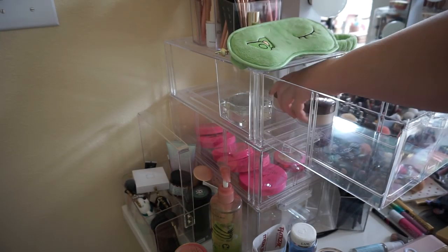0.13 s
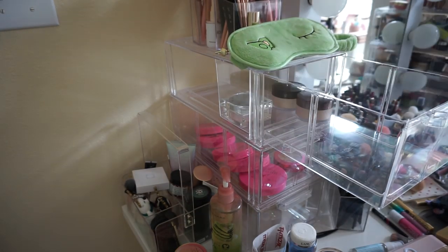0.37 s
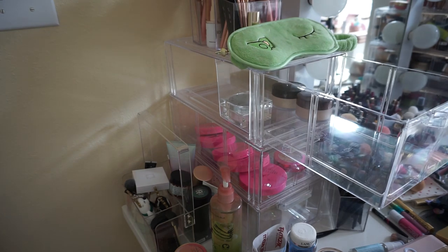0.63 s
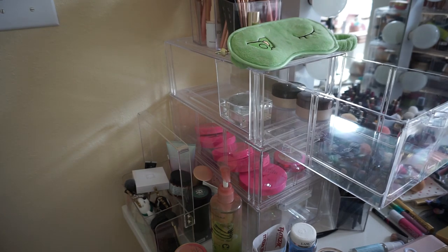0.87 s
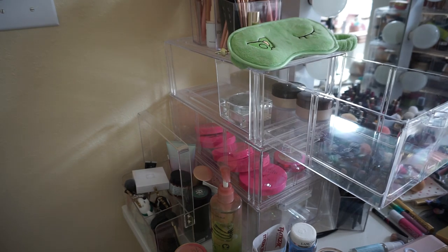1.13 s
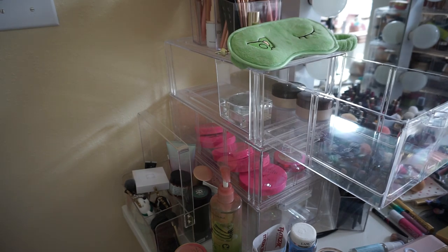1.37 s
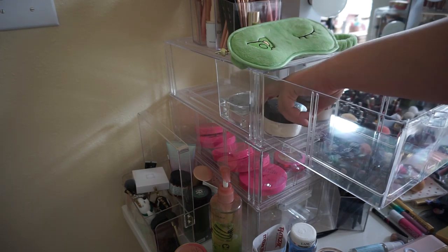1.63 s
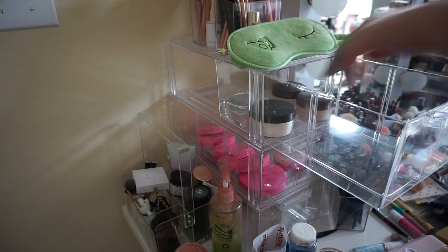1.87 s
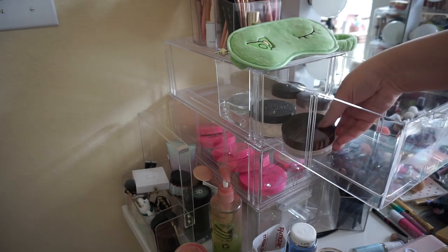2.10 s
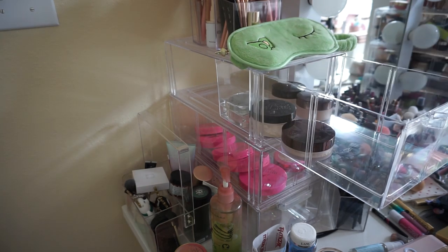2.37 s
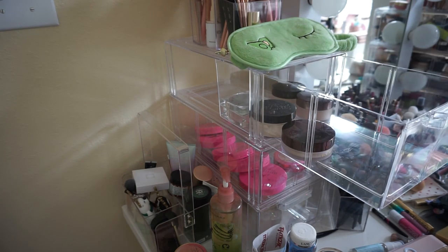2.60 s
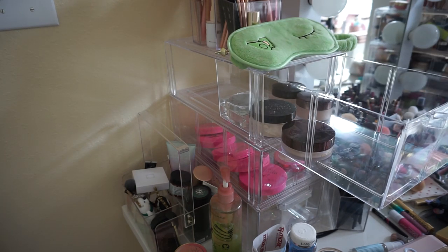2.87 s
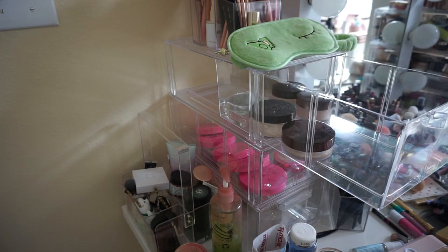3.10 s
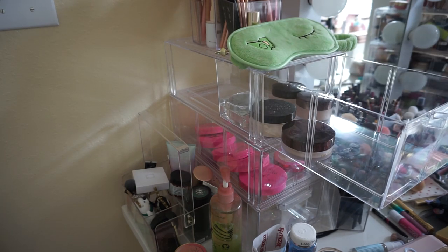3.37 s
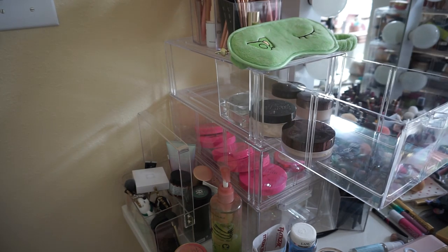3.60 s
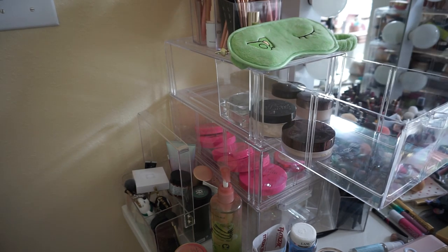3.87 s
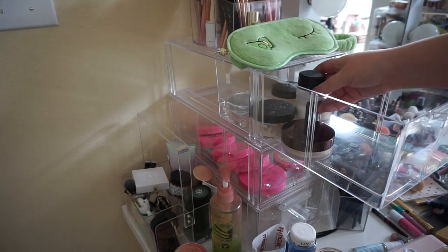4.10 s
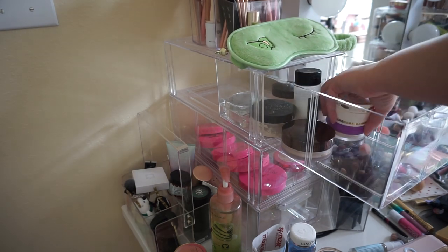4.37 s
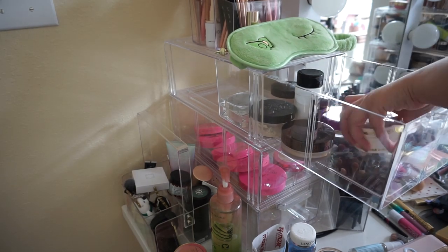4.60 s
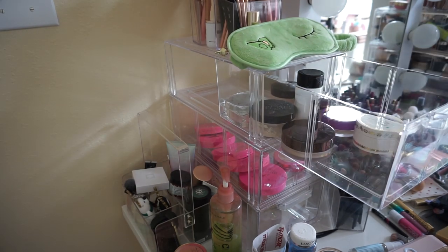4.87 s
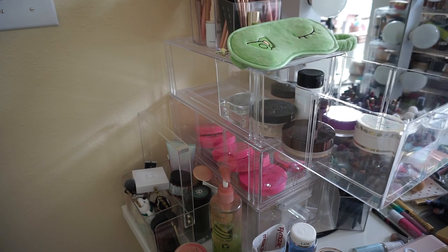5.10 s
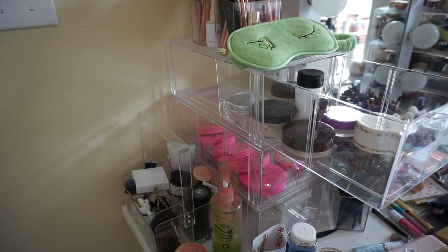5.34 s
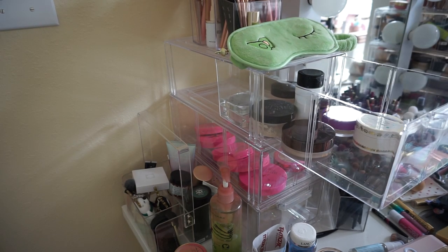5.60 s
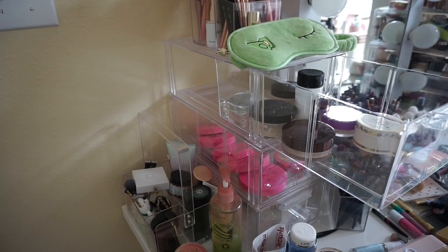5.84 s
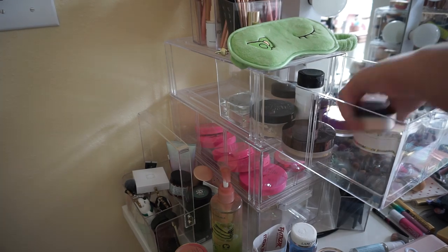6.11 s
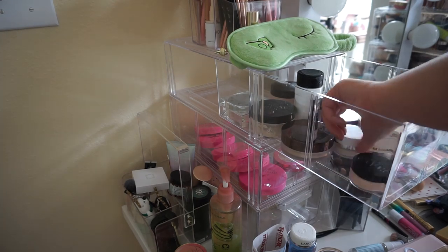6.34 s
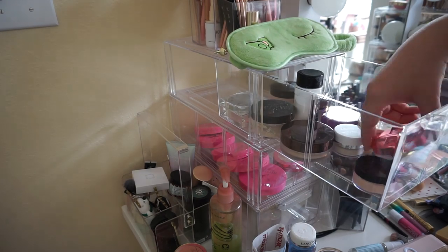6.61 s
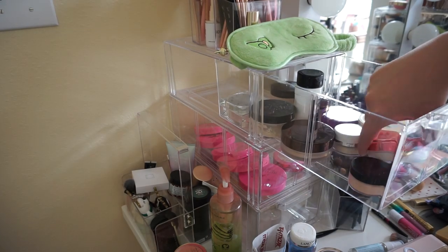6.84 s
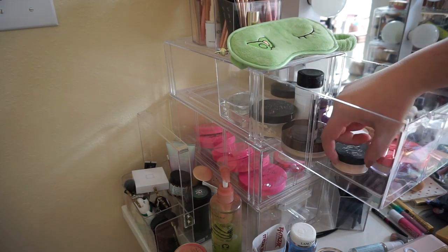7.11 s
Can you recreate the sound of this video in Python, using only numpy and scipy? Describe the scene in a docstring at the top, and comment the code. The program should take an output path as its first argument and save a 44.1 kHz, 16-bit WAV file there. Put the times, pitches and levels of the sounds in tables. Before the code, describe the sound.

A close, dry indoor scene with a faint wavering appliance hum and soft airy noise. From 0.05 to 0.3 s, jars hit a clear plastic drawer in loud, sharp clacks with a tiny scrape and a short low thump, fading into small taps until 0.6 s. Only faint ticks and rustling follow until about 1.7 s. Between 1.7 and 2.3 s come crisp double knocks, brightly ringing and hollow, the last one strong. Light touches and sleeve rustle fill the gap to 4 s. At 4.03 s a firm clack lands with smaller settling taps, then more clusters at 4.4-4.5 and 4.6-4.8 s. Quiet handling returns until 6.07 s, when dry clicks lead to hard knocks at 6.2 s, a sliding scrape around 6.3-6.5 s with accelerating chatter, and a busy run of clinks and clacks from 6.6 to about 7.2 s.

```python
"""Small cosmetic jars are set down in a clear acrylic drawer near a camera: each contact cracks, rings beating
modes and hisses; one dragged jar chatters, and slides are stick-slip noise through the same modes.
Light touches are faint coloured bursts, the hand and sleeve uneven noise; some hard blows carry a short low thump.
A fan or appliance hums, as wavering sines over airy noise, in a quiet furnished room."""
import sys
import numpy as np
from scipy import signal
from scipy.fft import rfft, irfft, next_fast_len
from scipy.io import wavfile
from scipy.ndimage import map_coordinates

SR = 44100
rng = np.random.default_rng(int(sys.argv[2]) if len(sys.argv) > 2 else 0)


def inscribe(sig):
    """Save sig as 16-bit PCM at rate SR to the path in sys.argv[1].

    A 1-D sig is mono; a 2-D sig holds one channel per row.
    Samples are clipped to [-1, 1] before scaling.
    """
    pcm = np.round(np.clip(np.atleast_2d(sig).T, -1, 1) * 32767)
    wavfile.write(sys.argv[1], SR, pcm.astype(np.int16))


def how_loud(loudness_db):
    """Turn decibels into a plain amplitude multiplier (0 dB gives 1, 20 dB gives 10)."""
    steps = np.asarray(loudness_db, float) / 20
    return 10 ** steps


N = 318402


def unit(x):
    """Scaled to rms 1."""
    return x / np.sqrt(np.mean(x ** 2) + 1e-20)


def along(points, hz):
    """Interpolates (f/Hz, value) points on a log frequency axis."""
    f, v = np.transpose(points)
    return np.interp(np.log(hz + 1), np.log(f + 1), v)


def wobble(rate_hz):
    """Smooth random curve with rate_hz knots a second."""
    return map_coordinates(rng.standard_normal(int(N * rate_hz / SR) + 4), [np.arange(N) * rate_hz / SR])


def filtered(x, response):
    """x times a response of frequency, padded against wrap-around."""
    n = x.shape[-1]
    m = next_fast_len(n + 4096)
    return irfft(rfft(x, m) * response(np.fft.rfftfreq(m, 1 / SR)), m)[..., :n]


def rush(n, spectrum, alike):
    """Stereo noise of rms 1: mid and side weights set the left-right likeness at each frequency."""
    def mid_side(hz):
        turn = np.arccos(np.clip(along(alike, hz), -1, 1)) / 2
        return how_loud(along(spectrum, hz)) * [np.cos(turn), np.sin(turn)]
    mid, side = filtered(rng.standard_normal((2, n)), mid_side)
    return unit(np.array([mid + side, mid - side]))


def add(out, s, sound):
    """Lays a sound into out from time s."""
    start = round(s * SR)
    out[:, start:start + sound.shape[-1]] += sound[:, :N - start]


# steady sound sinks at some hard blows: t/s, depth/dB
DIPS = [(-0.1, 8), (0.15, 9), (0.3, 8), (1.89, 1.5), (2.17, 6.5), (4.5, 9.5), (6.24, 8.5), (6.5, 8),
        (7.03, 9.5)]
SINK_S, RETURN_S = 0.019, 0.61


def sinking():
    """Gain of the steady sounds: a quick drop at each dip, a slow creep back."""
    t_s, depth_db = np.transpose(DIPS)
    since = np.arange(N) / SR - t_s[:, None]
    shape = np.clip(since / SINK_S, 0, 1) * np.exp(-np.abs(since / RETURN_S) ** 2.07)
    return how_loud(-np.max(depth_db[:, None] * shape, axis=0))


# hum lines: f/Hz, rms level/dB before waver, waver/dB
HUM_LINES = [(234.8, -58, 2.5), (296.6, -62, 3.5), (375, -46.5, 1), (482.4, -54, 1.2)]
# air noise colour: f/Hz, relative density/dB
AIR_COLOUR = [(12, -75), (25, -38), (70, -27.5), (128, -23), (230, -12), (320, -14), (430, -12),
              (540, -10.5), (1140, -13.5), (1900, -16.5), (3000, -20.5), (4600, -19.5), (6500, -27),
              (15200, -31.5), (16500, -62)]
# air and rustle: f/Hz, left-right likeness
AIR_ALIKE = [(30, 0.8), (180, 1), (550, 0.98), (1650, 0.64), (4970, 0.078), (15000, 0)]
AIR_DB, AIR_WAVER_DB = -46.5, 1.8


def background():
    """Nearly steady hum lines, wavering in level and phase, over airy noise."""
    t = np.arange(N) / SR
    hum = 0
    for hz, db, waver_db in HUM_LINES:
        level = how_loud(db + waver_db * wobble(12)) * np.sqrt(2)
        hum = hum + level * np.sin(2 * np.pi * hz * t + 0.13 * waver_db * wobble(10))
    return hum + how_loud(AIR_DB + AIR_WAVER_DB * wobble(5.1)) * rush(N, AIR_COLOUR, AIR_ALIKE)


# hand and sleeve movements: middle t/s, length/s, shuffle level/dB, rustle level/dB (before flutter)
HANDLING = [(0.292, 0.35, -35.5, -44.5), (0.72, 0.47, -83, -57), (1.466, 0.74, -52, -49),
            (1.854, 0.47, -40, -59), (2.61, 0.14, -67, -51), (2.954, 0.72, -52, -55),
            (3.9, 0.58, -64, -54.5), (4.308, 0.4, -44.5, -56), (4.492, 0.26, -40, -58),
            (4.795, 0.32, -47, -65), (5.02, 0.16, -54, -51), (6.03, 0.32, -47, -42.5),
            (6.17, 0.13, -55, -42), (6.293, 0.14, -34.5, -57), (6.706, 0.19, -43, -73),
            (7.025, 0.37, -42.5, -46)]
# dull shuffle colour: f/Hz, relative density/dB
SHUFFLE_COLOUR = [(300, -17), (550, -3), (1500, -0.5), (2600, -9), (5000, -11.5), (16000, -62)]
# skin and sleeve rustle colour: f/Hz, relative density/dB
RUSTLE_COLOUR = [(1500, -13), (4000, 3.5), (6000, 1.5), (13000, -2.5), (16000, -14)]
# jar contacts and shuffle: f/Hz, left-right likeness
NEAR_ALIKE = [(60, 0.97), (180, 0.99), (550, 1.0), (1650, 1), (4970, 0.72), (15000, 0.051)]
IDLE_SHUFFLE_DB, IDLE_RUSTLE_DB = -50, -60.5  # before flutter; the hand is never quite still


def handling(idle):
    """Faint uneven noise of hand and sleeve among the jars; each movement swells and fades."""
    s, length, shuffle_db, rustle_db = np.transpose(HANDLING)
    phase = (np.arange(N) / SR - s[:, None]) / length[:, None]
    swell = np.cos(np.pi * np.clip(phase, -.5, .5)) ** 2
    shuffle = how_loud(shuffle_db) @ swell + how_loud(IDLE_SHUFFLE_DB) * idle
    shuffle = shuffle * how_loud(4.34 * wobble(30) - 8.0)
    rustle = how_loud(rustle_db) @ swell + how_loud(IDLE_RUSTLE_DB) * idle
    rustle = rustle * how_loud(3 * wobble(40) - 2)
    return shuffle * rush(N, SHUFFLE_COLOUR, NEAR_ALIKE) + rustle * rush(N, RUSTLE_COLOUR, AIR_ALIKE)


# short low thumps at some hard blows: t/s, relative level/dB
THUMPS = [(0.141, -42), (0.256, -56), (1.864, -63), (2.258, -45.5), (4.025, -58), (4.5, -47), (6.222, -44),
          (7.026, -57)]


def thumps():
    """One brief low pulse that swings back once."""
    out, u = np.zeros((2, N)), np.arange(SR // 20) / SR / 0.00028
    for s, db in THUMPS:
        add(out, s, how_loud(db + 14) * np.array([(1 - u) * u * np.exp(-u)]))
    return out


# jar picked up or touching something: t/s, level/dB, centre f/Hz, 4 kHz and 10 kHz relative level/dB
TICKS = [(0.617, -42, 2360, 1, 7.5), (0.727, -47.5, 834, 0, 2), (0.998, -36, 1520, -3, -10.5),
         (1.106, -31, 2100, -4.5, -10), (1.409, -39, 797, -8, -9), (1.491, -40, 1340, -16, -29),
         (1.513, -28, 870, -18.5, -12), (1.608, -35.5, 1550, -21, -26), (2.507, -30, 2430, -1, 2),
         (2.55, -36, 1240, -40, -26), (2.775, -36.5, 1400, -14, -22), (2.854, -40.5, 904, -2, 12),
         (2.889, -30, 2620, -16, -9), (2.911, -29, 1590, -17, -12), (2.987, -42.5, 1130, 0, 12),
         (3.032, -35, 1430, -9, -17), (3.299, -32.5, 1100, -30, -21), (3.679, -44.5, 939, -4, -3),
         (3.862, -39.5, 1850, 0, -1), (3.95, -42, 1500, -3, -3), (4.976, -41.5, 1090, -8, -4),
         (5.084, -38.5, 1020, -6, -2.5), (5.508, -47, 1200, 0, 6.5), (5.824, -38.5, 1200, -2.5, -6),
         (5.936, -35.5, 1040, -12, -12), (6.6, -40, 535, -30, -40), (6.652, -36, 560, -35, -43)]
# dry clicks of a jar still gripped: same columns
CLICKS = [(6.067, -18, 1390, -20, -14), (6.075, -11.5, 1430, -2.5, 3), (6.093, -17.5, 1360, -7, -6),
          (6.681, -33, 1800, -17, -25), (6.72, -20, 2640, -8, -26), (7.016, -17.5, 3020, -5, -6)]
TICK_T60_S, CLICK_T60_S = 0.12, 0.021


def ticks(rows, t60_s):
    """Light touches: a short burst around one resonance, with a bright edge where the contact is hard."""
    out, t = np.zeros((2, N)), np.arange(SR // 5) / SR
    fade = how_loud(-60 * t / t60_s) * (1 - np.exp(-t / 0.00067))
    for s, db, centre_hz, mid_db, hard_db in rows:
        colour = [(200, -50), (0.71 * centre_hz, -14), (centre_hz, 0), (min(1.27 * centre_hz, 3600), -11),
                  (4300, mid_db - 4.5), (10000, hard_db - 10.0), (16000, hard_db - 16.5)]
        # level refers to the 750-3000 Hz part
        middle_power = np.mean(how_loud(along(colour, np.linspace(750, 3000, num=40))) ** 2)
        whole_power = np.mean(how_loud(along(colour, np.linspace(0, 16000, num=300))) ** 2)
        burst = rush(len(t), colour, NEAR_ALIKE) / np.sqrt(middle_power / whole_power)
        add(out, s, how_loud(db + 3.5) * fade * burst)
    return out


# jar pushed along the floor: t/s, length/s, first level/dB, last level/dB, strongest ring f/Hz
SLIDES = [(0.143, 0.053, -19.5, -31, 1830), (6.317, 0.185, -28, -18, 1970), (7.031, 0.038, -31, -39, 2120)]
# scrape noise colour: f/Hz, relative density/dB
SCRAPE_COLOUR = [(240, -86), (400, -67), (528, -4.5), (598, -37), (1230, -11), (1530, -7), (2400, -1.5),
                 (2880, -3), (7280, -5.5), (16000, -15)]
# modes of drawer and jars, also rung by contacts(): f/Hz, relative level/dB, t60/s
DRAWER_MODES = [(564.3, 2.5, 0.16), (833, 1, 0.19), (1001, 10, 0.16), (1145, 5.5, 0.1), (1390, 0, 0.12),
                (1540, 6, 0.08), (1637, 11.5, 0.04), (1803, 8, 0.064), (2010, 0, 0.099), (2167, 4.5, 0.044),
                (2424, 0.5, 0.1), (2604, 7, 0.05), (2657, 6, 0.02), (2850, -3, 0.12), (3600, 2, 0.053),
                (3880, 6, 0.047), (4085, -9, 0.046), (4220, -36, 0.11), (4503, 4.5, 0.087),
                (4970, -15.5, 0.19), (5176, -5, 0.12)]
SLIDE_START_S, SLIDE_STOP_S, SLIDE_STOP_DB = 0.004, 0.033, -24.5
CATCHES_PER_S, GRAIN_T60_S, BODY_WIDTH_HZ = 450, .012, 50


def slide():
    """The jar's foot sticks and slips in uneven grains that drive the drawer and jar modes."""
    out = np.zeros((2, N))
    grain = how_loud(-60 * np.arange(SR // 40) / SR / GRAIN_T60_S)
    for s, length, first_db, last_db, ring_hz in SLIDES:
        t = np.arange(-SLIDE_START_S, length + SLIDE_STOP_S, 1 / SR)
        db = np.interp(t, [t[0], 0, length, t[-1]],
                       [first_db - 29, first_db, last_db, last_db + SLIDE_STOP_DB])
        catches = (rng.random(len(t)) < CATCHES_PER_S / SR) * rng.random(len(t)) * (t < length)
        slips = .4 + signal.fftconvolve(catches, grain)[:len(t)]

        def body(f):
            spot = how_loud(2 * np.exp(-(np.log((f + 1) / ring_hz) / 0.75) ** 2))
            damping = 1j * f * BODY_WIDTH_HZ
            modes = .5
            for k, (mode_hz, mode_db, _) in enumerate(DRAWER_MODES):
                modes = modes + (-1) ** k * how_loud(mode_db) * damping / (mode_hz ** 2 - f * f + damping)
            return spot * modes

        scrape = filtered(slips * rush(len(t), SCRAPE_COLOUR, NEAR_ALIKE), body)
        add(out, s + t[0], how_loud(db) * unit(scrape))
    return out


# jar on drawer or jar: t/s, level/dB, strongest ring f/Hz, floor panel and jar relative level/dB
CONTACTS = [(0.0655, -8.5, 1710, -10.5, -2), (0.0987, -15, 1800, -20, -6), (0.1423, -10, 1750, -12.5, 2),
            (0.2237, -30, 1720, -16, 4), (0.2577, -4.5, 1900, -38, -10), (0.2621, -9.5, 1860, -12, 1.5),
            (0.295, -6, 1486, -21, 1), (0.3651, -35, 1640, -13, -18), (0.4285, -31, 1640, -5, -28),
            (0.467, -36, 1540, -3, -21), (0.53, -40, 1550, 0.5, -16), (0.584, -45, 1480, -3, -8),
            (1.702, -6, 2340, -14.5, -5), (1.8165, -9, 1607, -12.5, -0.5), (1.8658, -5, 1840, -14.5, -13.5),
            (1.8763, -5, 1850, -16, -8.5), (2.1241, -7.5, 2650, -11.5, -1), (2.1354, -9.5, 1390, -19, -13),
            (2.167, -5.5, 2660, -14.5, -2.5), (2.1754, -13.5, 1820, -8, -32),
            (2.2597, -3, 2570, -11.5, -2.5), (4.0264, -4.5, 1530, -8, -9.5),
            (4.0672, -15.5, 1720, -12, -12), (4.1123, -10.5, 2060, -9, -8), (4.1658, -23.5, 1800, -6, -6),
            (4.1838, -20, 1800, -13, -15), (4.4195, -5, 1635, -35, -7.5), (4.4339, -15, 1570, -10.5, -8),
            (4.4765, -14, 2030, -9, -14), (4.4865, -17, 2000, -11, -8), (4.502, -8, 1540, -19, -1),
            (4.6314, -23.5, 1680, -10, -14.5), (4.6711, -6.5, 1555, -16.5, -5),
            (4.7247, -21.5, 1700, -28, -3), (4.7306, -13, 1700, -13, -1.5), (4.7872, -26.5, 1810, -8, -10),
            (4.8061, -23.5, 1550, -13, -7), (6.2229, -8.5, 1910, -18, -3.5),
            (6.2456, -13.5, 2010, -10.5, -3.5), (6.2843, -23, 1520, 0, -1), (6.3132, -10.5, 1560, -15, 1),
            (6.3482, -7, 1700, -26, -2.5), (6.356, -6.5, 1800, -27, -2.5), (6.5787, -11.5, 1540, -9.5, 1),
            (6.6326, -14, 2710, -27, -5), (6.6891, -16.5, 2300, -19, -5.5), (6.7316, -11.5, 2620, -22.5, 4),
            (6.7705, -19.5, 2010, -12.5, -18), (6.8183, -25.5, 1530, -8, -7), (6.834, -32, 1540, -15, -4),
            (6.8643, -23.5, 2200, -9, -4.5), (6.8912, -19, 1610, -21, -6), (6.8958, -9.5, 2700, -18.5, 1),
            (6.9335, -6, 2680, -16.5, -8), (6.9506, -7.5, 1540, -17, -9), (7.0273, -12, 3000, -15.5, 3.5),
            (7.1605, -14.5, 2860, -18.5, -4.5), (7.1776, -10.5, 2220, -18, -1.5)]
CHATTER_S, CHATTER_GAP_S, CHATTER_SHRINK = 6.398, .016, .93  # first skip, first gap, next gap over it
CHATTER_SWELL_DB, CHATTER_SCATTER_DB = 0.5, 2.0  # gain per skip, random spread
SKIP_DB, SKIP_RING_HZ, SKIP_PANEL_DB, SKIP_JAR_DB = -14.5, 2397.5, -29, -6


def blows():
    """Single contacts, plus the skips of a dragged jar that chatters ever faster."""
    gaps = CHATTER_GAP_S * CHATTER_SHRINK ** np.arange(8)
    skips = []
    for k, s in enumerate(CHATTER_S + np.cumsum(gaps) - gaps):
        db = SKIP_DB + CHATTER_SWELL_DB * k + CHATTER_SCATTER_DB * rng.standard_normal()
        skips.append((s, db, SKIP_RING_HZ, SKIP_PANEL_DB, SKIP_JAR_DB))
    return list(CONTACTS) + skips


# jar in the hand: from t/s, upper ring f/Hz, 10 kHz edge relative level/dB
JARS = [(0, 4260, -14.5), (0.2, 4300, -17.5), (0.28, 4600, -23.5), (1.6, 4100, -14.5), (2, 4330, -17),
        (3.9, 3980, -20), (4.3, 4120, -15), (4.6, 4100, -18), (6.2, 3900, -14), (6.55, 4380, -18),
        (6.62, 3860, -24), (6.92, 4070, -19), (7.1, 3800, -23)]
BEAT_HZ, BEAT_DEPTH = 43.8, 0.46  # each mode is a close pair; rms beat rate
SPOT_SCATTER_DB = 2.5  # spread of a mode's strength from blow to blow


def contacts():
    """Each contact cracks and rings the modes at new strengths; dense upper modes blur to a dying hiss."""
    out, t = np.zeros((2, N)), np.arange(SR // 5) / SR
    hz, mode_db, t60 = np.transpose(DRAWER_MODES)
    # decay, first echoes, crack, snap
    fade = (how_loud(-60 * t / 0.14) + 0.85 * how_loud(-60 * t / 0.072)
            + 3.2 * how_loud(-60 * t / 0.0063) + 6.0 * how_loud(-60 * t / 0.0016))
    for s, db, ring_hz, panel_db, jar_db in blows():
        _, jar_hz, edge_db = [jar for jar in JARS if jar[0] <= s][-1]
        hard_db = jar_db + edge_db
        rise_s = 0.00023 * how_loud(-.9 * (db + 2.5))  # a weaker blow stays longer in contact
        colour = [(120, panel_db - 72), (500, panel_db - 3), (760, panel_db - 2), (950, panel_db + 0.5),
                  (0.89 * ring_hz, -5), (ring_hz, -1), (min(1.54 * ring_hz, 2900), -5),
                  (0.95 * jar_hz, jar_db - 2.5), (jar_hz, jar_db + 2.0), (1.07 * jar_hz, jar_db - 2.5),
                  (6700, (jar_db + hard_db) / 2 + 0.5), (10000, hard_db + 7.5), (16000, hard_db - 1.5)]
        scatter, phase, beat_rate, beat_phase = rng.standard_normal((4, len(hz), 1))
        # the spot struck favours the modes near one pitch
        spot_db = 7 * np.exp(-(np.log(hz / ring_hz) / 0.052) ** 2)
        strength = how_loud((mode_db + spot_db + along(colour, hz))[:, None] + SPOT_SCATTER_DB * scatter)
        ring = strength * how_loud(-60 * t / t60[:, None]) * np.sin(2 * np.pi * hz[:, None] * t + 1.1 * phase)
        beat = 1 + BEAT_DEPTH * np.sin(2 * np.pi * BEAT_HZ * beat_rate * t + np.pi * beat_phase)
        ring = (ring * beat).sum(0)
        hiss = how_loud(np.max(np.transpose(colour)[1])) * fade * rush(len(t), colour, NEAR_ALIKE)
        onset = 1 - np.exp(-t / rise_s)
        add(out, s, how_loud(db) * onset * (how_loud(-18.5) * ring + how_loud(-15.5) * hiss))
    return out


TREBLE_PAN_DB = -2.5  # left minus right


def placed(x):
    """The camera body shades the treble of the far microphone; the bass stays centred."""
    treble = filtered(x, lambda hz: 1 / (1 + (2200 / (hz + 1)) ** 2))
    return x + treble * (how_loud([[TREBLE_PAN_DB / 2], [-TREBLE_PAN_DB / 2]]) - 1)


def scene():
    """Jars close to the camera over thumps, handling and background."""
    jars = placed(contacts() + slide() + ticks(CLICKS, CLICK_T60_S) + ticks(TICKS, TICK_T60_S))
    # small bodies radiate no bass
    jars = signal.sosfilt(signal.butter(3, 420, "highpass", fs=SR, output="sos"), jars)
    steady = sinking()
    return jars + thumps() + handling(steady) + steady * background()


def low_pass(x):
    """Removes everything above the highest recorded frequency."""
    return signal.sosfilt(signal.butter(12, 16980, fs=SR, output="sos"), x)


def record(dry):
    """Peaks are rounded off at full scale."""
    mix = dry / (1 + np.abs(dry) ** 14) ** (1 / 14)
    return low_pass(mix)


dry = scene()
out = record(dry)
inscribe(out)
```